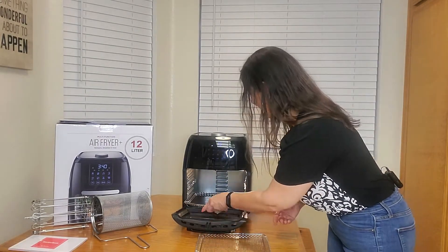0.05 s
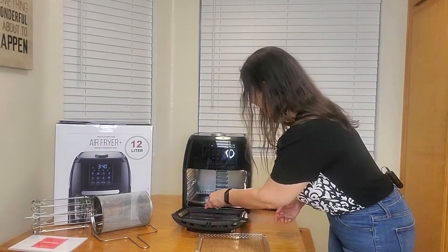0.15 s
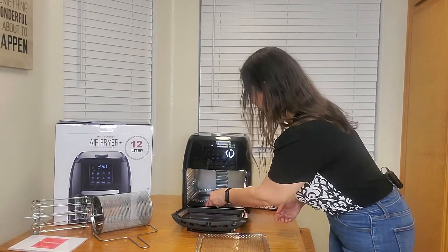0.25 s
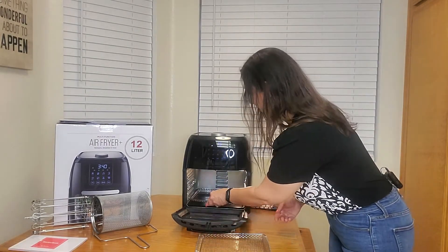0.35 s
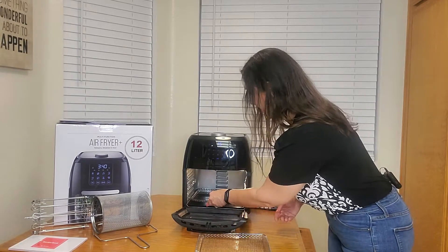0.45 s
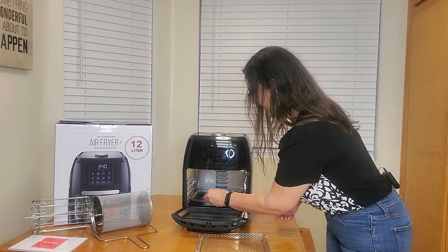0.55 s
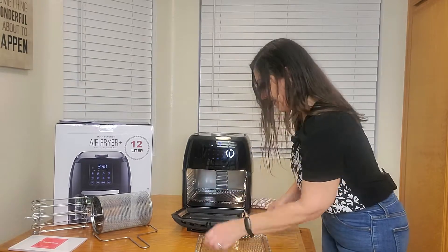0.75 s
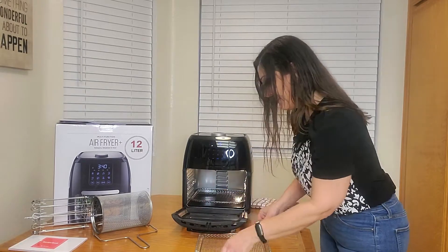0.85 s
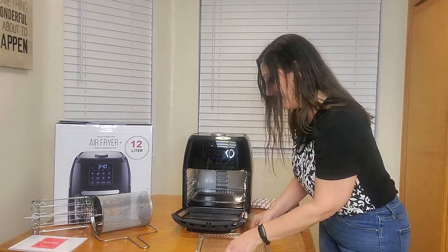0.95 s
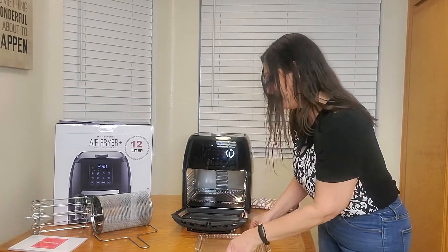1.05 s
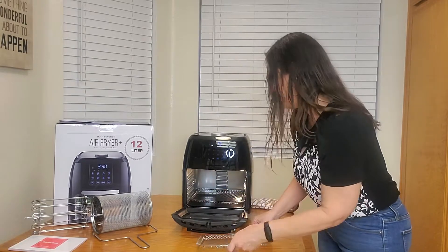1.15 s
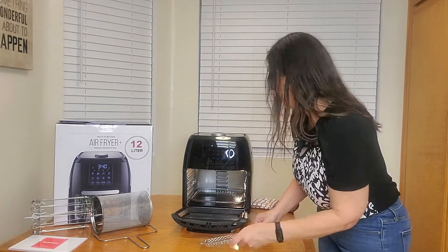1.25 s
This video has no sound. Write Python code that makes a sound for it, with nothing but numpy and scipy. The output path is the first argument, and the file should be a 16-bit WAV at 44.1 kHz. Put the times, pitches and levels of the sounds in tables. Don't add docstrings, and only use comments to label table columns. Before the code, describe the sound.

A wire tray scrapes and rattles along the rails of a small countertop oven, hits the back wall with a loud clack and settles; then a mesh rack drags over a wooden table. Reverberant kitchen, distant microphone.

```python
import sys
import numpy as np
from scipy import signal
from scipy.fft import rfft, irfft
from scipy.io import wavfile
from scipy.ndimage import uniform_filter1d

SR = 44100
rng = np.random.default_rng(int(sys.argv[2]) if len(sys.argv) > 2 else 0)


def unload_wav(signal):
    wavfile.write(
        sys.argv[1],
        SR,
        np.round(np.clip(np.atleast_2d(signal).T, -1, 1) * 32767).astype(np.int16),
    )


def volts_from_db(level):
    exponent = np.asarray(level, float) / 20
    return 10 ** exponent


N = 57330
T = np.arange(N) / SR

# (frequency [Hz], level [dB], t60 [s])
OVEN_MODES = [(163.4, 4, 0.071), (200.4, -2, 0.15), (293, -6, 0.13), (335, -2.5, 0.33), (374, -1, 0.033),
              (472, 0, 0.31), (534, -4, 0.11), (656, -4.5, 0.27), (792.2, 3, .08), (936, -3.5, 0.11),
              (1094, -3, 0.024), (1187, -6, 0.062), (1397, -18, 0.1), (1770, -15, 0.035)]
# (frequency [Hz], level [dB])
TRAY_GRIT = [(800, -23.5), (1200, -0.5), (2200, -4.5), (4500, -7), (5600, -10.5), (6600, -23),
             (7500, -13.5), (15000, -30.5)]
# (frequency [Hz], level [dB], t60 [s])
TRAY_RASP = [(1210, 5, 0.011), (1720, -3.5, .012), (2470, -7.5, 0.0079), (3430, -5.5, 0.0066),
             (4250, 1, 0.0063), (5170, -5, 0.0055), (7120, -8.5, 0.0091)]


def level(x, db):
    return x * volts_from_db(db) / np.sqrt(np.mean(x ** 2))


def set_peak(x, db):
    return x * volts_from_db(db) / np.abs(x).max()


def colour(x, spectrum):
    points = np.array(spectrum)
    hz = np.arange(2049) * SR / 4096 + 1
    db = np.interp(np.log(hz), np.log(points[:, 0]), points[:, 1])
    cepstrum = irfft(db * np.log(10) / 20)
    cepstrum[1:2048] *= 2
    cepstrum[2049:] = 0
    return signal.fftconvolve(x, irfft(np.exp(rfft(cepstrum))))[:N]


def ring(x, modes):
    out, energy = 0, 0
    for hz, db, t60_s in modes:
        pole = np.exp(2j * np.pi * hz / SR - np.log(1000) / (t60_s * SR))
        gain = rng.choice([-1, 1]) * volts_from_db(db) * np.sqrt(2 - 2 * abs(pole) ** 2)
        out = out + gain * signal.lfilter([1], [1, -pole], x).imag
        energy += volts_from_db(2 * db)
    return out / np.sqrt(energy)


def burst(at_s, decay_s):
    return (T >= at_s) * np.exp(-np.clip(T - at_s, 0, None) / decay_s)


def swell(at_s, length_s):
    return np.sin(np.pi * np.clip((T - at_s) / length_s, 0, 1))


def grains():
    grains_per_s, scatter_db, patchy_db = 6000, 1, 2.5
    hold = 300
    patch = np.repeat(rng.standard_normal(N // hold + 1), hold)
    patch = uniform_filter1d(patch, hold)[:N]
    hit = rng.random(N) < grains_per_s / SR
    size_db = scatter_db * rng.exponential(size=N) + patchy_db * patch
    return level(hit * rng.standard_normal(N) * volts_from_db(size_db), 0)


def rasp(x, grit, modes):
    rasp_db = -2
    struck = x * np.sign(rng.standard_normal(N))
    impulse = 1. * (T == 0)
    grit_gain = np.sqrt(np.sum(colour(impulse, grit) ** 2))
    return colour(x, grit) / grit_gain + volts_from_db(rasp_db) * ring(struck, modes)


def scrape(curve, body, grit, modes):
    time_s, rumble_db, grit_db = np.array(curve).T
    db = np.interp(T, time_s, rumble_db, -120, -120)
    relative_db = np.interp(T, time_s, grit_db)
    rumble = ring(grains() * volts_from_db(db - 3.5), body)
    return rumble + rasp(grains() * volts_from_db(db + relative_db - 2), grit, modes)


def knocks(events):
    attack_s, t60_s, t60_per_hold, wobble_hz, wobble_rad = .0011, .016, 1.2, 40, .5
    out = 0
    for at_s, db, hz, hold_s in events:
        phase, wobble_phase = rng.random(2)
        age = np.clip(T - at_s, 0, None)
        attack = np.clip(age / attack_s, 0, 1)
        decay = volts_from_db(-60 * np.clip(age - hold_s, 0, None) / (t60_s + t60_per_hold * hold_s))
        wobble = wobble_rad * np.sin(2 * np.pi * (wobble_hz * age + wobble_phase))
        out = out + volts_from_db(db) * attack * decay * np.sin(2 * np.pi * (hz * age + phase) + wobble)
    return out


def tray_slide():
    # (time [s], rumble level [dB], grit level re rumble [dB])
    slide = [(0, -24.5, -13), (.066, -39.5, -12), (.088, -27.5, -13), (.125, -30.5, -9), (.2, -33.5, -10),
             (.207, -32, 1), (.27, -27, -5.5), (.34, -27.5, -11), (.399, -32, -12)]
    return scrape(slide, OVEN_MODES, TRAY_GRIT, TRAY_RASP)


def tray_knocks():
    # (time [s], level [dB], pitch [Hz], chatter [s])
    rail_hits = [(.004, -30, 335, 0.025), (.078, -30, 474, 0.015), (.092, -35, 870, 0.025),
                 (.13, -33.5, 476.3, 0.039), (.206, -25.5, 1047, 0.0038), (.231, -38.5, 1262, .02),
                 (.258, -22.5, 815, 0.007), (.262, -24, 473.7, .04), (.265, -29, 210.5, 0.013),
                 (.312, -26, 852, 0.011), (.314, -26.5, 645, .015), (.318, -25, 206, 0.013),
                 (.325, -27.5, 500, 0.015), (.35, -24, 184, 0.015), (.366, -25, 831, 0.017),
                 (.573, -53.5, 4090, 0.0049)]
    return knocks(rail_hits)


def clack():
    # (frequency [Hz], level [dB], t60 [s])
    wall_modes = [(148.7, -17.5, 0.38), (200, 3.5, 0.056), (307, -11, .25), (371, -5.5, 0.13),
                  (445, -5, 0.09), (546.2, -12.5, 0.23), (572, -5, 0.07), (640, 2, 0.12), (782, -12, 0.14),
                  (915, -14, 0.2), (1010, -3.5, 0.09), (1315, -14.5, 0.065), (2250, -14, 0.025)]
    # (frequency [Hz], level [dB])
    crack_spectrum = [(59, -44.5), (100, -11.5), (674, -6), (1510, -14.5), (2030, -21), (3040, -21),
                      (10800, -32), (14900, -43.5), (15900, -59.5)]
    at_s, rise_s, chatter_s = .4052, .002, .0056
    crack_s, shudder_s, shudder_db = .0095, .036, -7
    age = np.clip(T - at_s, 0, None)
    rise = 1 - np.exp(-(age / rise_s) ** 2)
    body = 0
    for hz, db, t60_s in wall_modes:
        body = body + volts_from_db(db - 60 * age / t60_s) * np.sin(2 * np.pi * hz * (age - chatter_s) + 1)
    snap = burst(at_s + .0023, crack_s) * np.clip((age - .001) / .0044, 0, 1)
    shudder = volts_from_db(shudder_db) * burst(at_s, shudder_s) * rise
    crack = colour(rng.standard_normal(N) * (snap + shudder), crack_spectrum)
    return set_peak(rise * body, 2.5) + set_peak(crack, -4)


def tray_rocks():
    # (time [s], level [dB], pitch [Hz], chatter [s])
    rocks = [(.413, -16, 255, .005), (.417, -15, 600, .005), (.422, -16, 410, 0.0045),
             (.438, -25.5, 462, 0.023), (.445, -25, 249, 0.0096), (.477, -28, 375, .009),
             (.125, -36, 158, .06), (.29, -36, 140, .02), (.572, -44, 650, .006), (.5, -33, 381, 0.018),
             (.498, -37.5, 274, 0.013), (.52, -39, 326, 0.011), (.57, -42, 310, 0.0076),
             (.586, -36.5, 293, 0.051), (.59, -40, 218, 0.025), (.595, -43, 634, 0.0089),
             (.615, -44, 460, 0.014), (.642, -45, 217, 0.035), (.645, -49, 800, 0.017),
             (.675, -44, 291, 0.021), (.27, -32, 640, 0.027), (.9, -62, 310, 0.042)]
    return knocks(rocks)


def hand_settle():
    # (time [s], rumble level [dB], grit level re rumble [dB])
    settle = [(.54, -56.5, -16.5), (.58, -38, -18.5), (.62, -33.5, -28), (.665, -40.5, -47),
              (.73, -61, -32)]
    tilt_hz_per_db = 63
    dull_oven = [(hz, db - hz / tilt_hz_per_db, t60_s) for hz, db, t60_s in OVEN_MODES]
    return scrape(settle, dull_oven, TRAY_GRIT, TRAY_RASP)


def rack_drag():
    # (time [s], rumble level [dB], grit level re rumble [dB])
    drag = [(0.97, -50, -31), (0.982, -52, -40.5), (1.008, -46, -35), (1.038, -36.5, -26.5),
            (1.098, -54, -3), (1.144, -64, -3.5), (1.162, -39, -30.5), (1.232, -31.5, -32),
            (1.3, -25, -26.5)]
    # (frequency [Hz], level [dB], t60 [s])
    table_modes = [(207.4, -3.5, 0.01), (286, -10, .05), (326, 1, 0.14), (397, -6, 0.13), (456, 1, 0.37),
                   (569, -9.5, 0.12), (638, -5, 0.019), (777, -8, 0.12), (916, -19, 0.057),
                   (1330, -27.5, .04)]
    # (frequency [Hz], level [dB])
    mesh_grit = [(590, -25), (1000, 3), (1490, -0.5), (1610, 1), (2310, -7), (3300, -22), (4060, -15),
                 (14000, -41)]
    # (frequency [Hz], level [dB], t60 [s])
    mesh_rasp = [(1564, 3, .01), (2215, 8, 0.0081), (2900, -1, 0.0075), (3410, 2, 0.0067),
                 (8300, -15, 0.024)]
    return scrape(drag, table_modes, mesh_grit, mesh_rasp)


def rack_bumps():
    # (time [s], level [dB], pitch [Hz], chatter [s])
    bumps = [(.981, -40.5, 336, 0.0028), (1.011, -40.5, 412, 0.0026), (1.032, -42, 563, 0.0085),
             (1.04, -37, 280.4, 0.032), (1.096, -45, 780, 0.02), (1.093, -44, 590, 0.018),
             (1.156, -29.5, 316.2, 0.021), (1.19, -30, 326, 0.016), (1.218, -44, 322.4, 0.013),
             (1.242, -43, 640, 0.007), (1.255, -34, 456, 0.032), (1.275, -32, 345, 0.033),
             (1.26, -60, 3150, 0.021), (.996, -49.5, 296, 0.0026)]
    return knocks(bumps)


def rack_taps():
    # (time [s], peak level [dB], pitch [Hz])
    feet = [
        (.981, -43.5, 420),
        (1.01, -40.5, 480),
        (1.032, -35.5, 520),
        (1.043, -39, 400),
        (1.158, -41.5, 600),
        (1.242, -30, 560),
    ]
    decay_cycles = .35
    out = 0
    for at_s, db, hz in feet:
        turns = np.clip(T - at_s, 0, None) * hz
        swing = turns ** 2 * np.sin(2 * np.pi * turns) * np.exp(-turns / decay_cycles)
        out = out + 18 * volts_from_db(db) * swing
    return out


def wire_ticks():
    # (time [s], level [dB], decay [s])
    wire_taps = [
        (.004, -41, 0.015),
        (.09, -41, .012),
        (0.112, -40, 0.0096),
        (.176, -35.5, 0.015),
        (0.205, -33.5, 0.046),
        (0.269, -35.5, .004),
        (0.351, -35.5, 0.016),
        (1.298, -39.5, .003),
    ]
    strength = sum(volts_from_db(db) * burst(at_s, decay_s) for at_s, db, decay_s in wire_taps)
    return rasp(grains() * strength, TRAY_GRIT, TRAY_RASP)


def creaks():
    # (time [s], level [dB], decay [s])
    thin_ticks = [(.116, -33.5, 0.0046), (.176, -31.5, .004), (.27, -37, 0.0035), (.733, -67.5, 0.0042),
                  (.795, -71.5, .004), (.869, -66.5, 0.0034), (.922, -62.5, 0.0019), (1.023, -55, 0.00097),
                  (1.2985, -36, .002), (.78, -74, .008), (.885, -72, .006)]
    band = signal.butter(1, [3500, 11000], "bandpass", fs=SR, output="sos")
    thin = signal.sosfilt(band, rng.standard_normal(N))
    return thin * sum(volts_from_db(db) * burst(at_s, decay_s) for at_s, db, decay_s in thin_ticks)


def wire_songs():
    # (time [s], level [dB], pitch [Hz], length [s])
    rubs = [(.09, -42, 4250, .042), (0.085, -49, 2600, 0.025), (.152, -41, 4110, 0.026),
            (.162, -42, 2650, .04), (0.168, -45.5, 5860, 0.017), (.212, -39.5, 2374, .015),
            (.228, -36, 1700, .03), (0.228, -31.5, 1190, .012), (.257, -38, 4090, .03),
            (0.267, -42.5, 5070, .012), (0.566, -67.5, 7750, .008), (0.61, -76, 8700, .008),
            (.654, -79, 8700, .014), (.6, -80, 6120, .12), (.58, -53, 1170, .06), (.6, -62, 1450, .07),
            (.65, -64, 1050, .06), (1.075, -66, 3400, .05), (1.09, -66, 1900, .04), (1.15, -46, 480, .03),
            (1.062, -62, 2790, 0.038), (1.075, -60, 2300, .05)]
    t60_s = .026
    noise = rng.standard_normal(N)
    out = 0
    for at_s, db, hz, length_s in rubs:
        pressure = (T > at_s) * np.clip(swell(at_s, length_s), 0, None) ** .5
        out = out + ring(noise * volts_from_db(db) * pressure, [(hz, 0, t60_s)])
    return out


def shimmer():
    # (frequency [Hz], level [dB], t60 [s])
    wire_modes = [(4130, -11, .06), (4660, -5, .08), (6120, 0, 0.07), (8100, -2, .07), (8700, -11, 0.066)]
    at_s, length_s, buzz_db = .58, .13, -76
    return ring(grains() * volts_from_db(buzz_db) * swell(at_s, length_s), wire_modes)


def room(x):
    tail_db, gap_s, low_t60_s, top_t60_s = -7, .0038, .57, .24
    tail = 0
    for hz in 100 * 2. ** np.arange(8):
        t60_s = np.interp(np.log2(hz / 400), [-.6, 4.5], [low_t60_s, top_t60_s])
        band = signal.butter(2, [hz / 2 ** .5, hz * 2 ** .5], "bandpass", fs=SR, output="sos")
        tail = tail + signal.sosfilt(band, rng.standard_normal(N)) * volts_from_db(-60 * T / t60_s)
    tail = tail * (T > gap_s)
    return volts_from_db(tail_db) * signal.fftconvolve(x, tail / np.sqrt(np.sum(tail ** 2)))[:N]


def kitchen():
    # (frequency [Hz], level [dB])
    air_spectrum = [(15, -49), (25, -25.5), (64, -5.5), (87, -15), (189, -4.5), (235, -23.5), (1320, -51),
                    (3140, -51), (15900, -64.5)]
    # (frequency [Hz], rms level [dB])
    hum_partials = [(59.5, -51.5), (181, -56.5)]
    sway_db = uniform_filter1d(rng.standard_normal(N), 3000) * 36.5
    hum = 0
    for k, (hz, db) in enumerate(hum_partials):
        hum = hum + volts_from_db(db + 2 + sway_db) * np.sin(2 * np.pi * hz * T + k)
    return level(colour(rng.standard_normal(N), air_spectrum), -52.5) + hum


def scene():
    low_cut_hz, clack_wet_db = 132, -6
    near = tray_slide() + tray_knocks() + hand_settle() + rack_drag() + rack_bumps()
    near = near + wire_ticks() + creaks() + shimmer()
    hit = clack()
    wet = near + hit + room(near + volts_from_db(clack_wet_db) * hit)
    low_cut = signal.butter(2, low_cut_hz, "highpass", fs=SR, output="sos")
    direct = tray_rocks() + wire_songs() + rack_taps()
    return (signal.sosfilt(low_cut, wet) + direct + kitchen())[None]


def low_pass(x):
    return signal.sosfilt(signal.butter(12, 16040, fs=SR, output="sos"), x)


def record(dry):
    peak_top = .97
    soft = dry / (1 + (dry / peak_top) ** 8) ** .125
    return low_pass(soft)


dry = scene()
out = record(dry)
unload_wav(out)
```